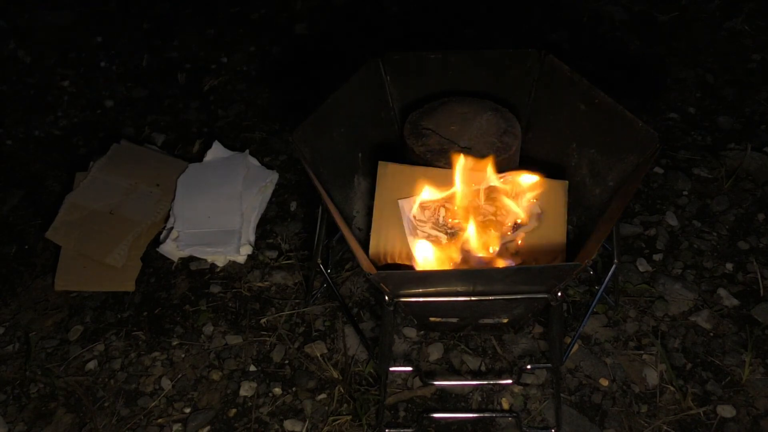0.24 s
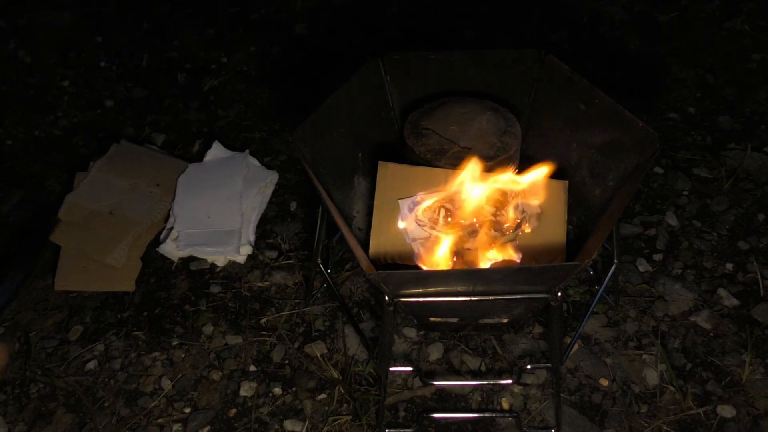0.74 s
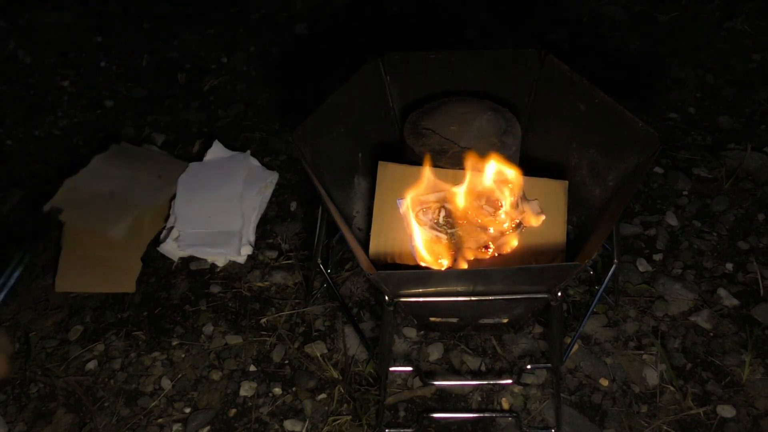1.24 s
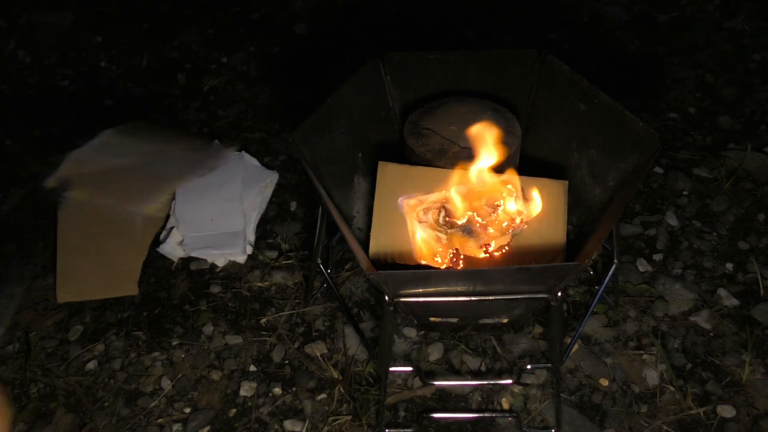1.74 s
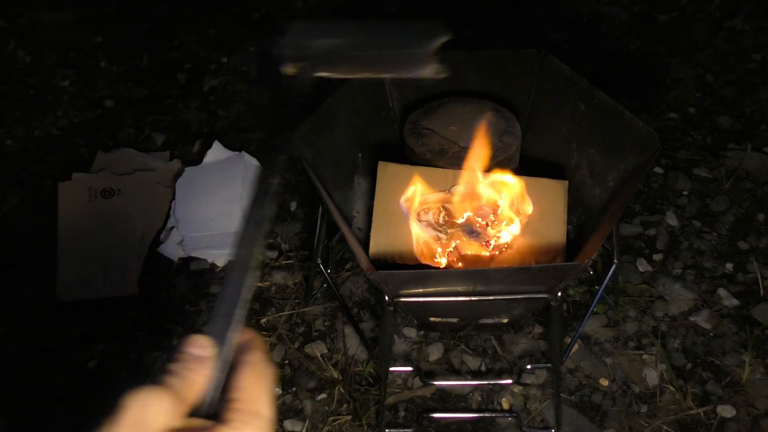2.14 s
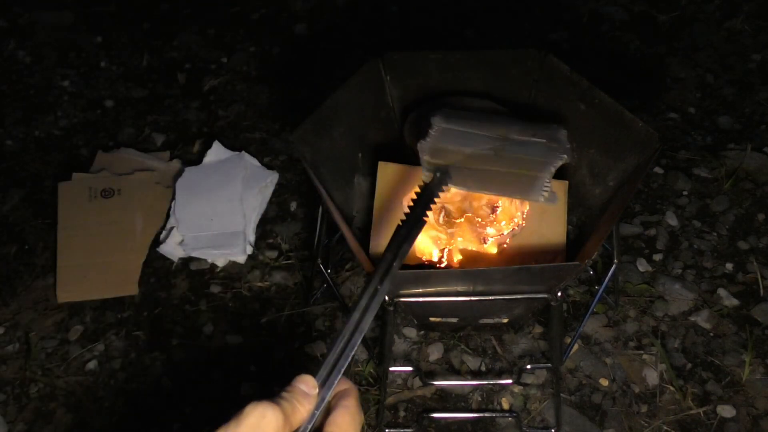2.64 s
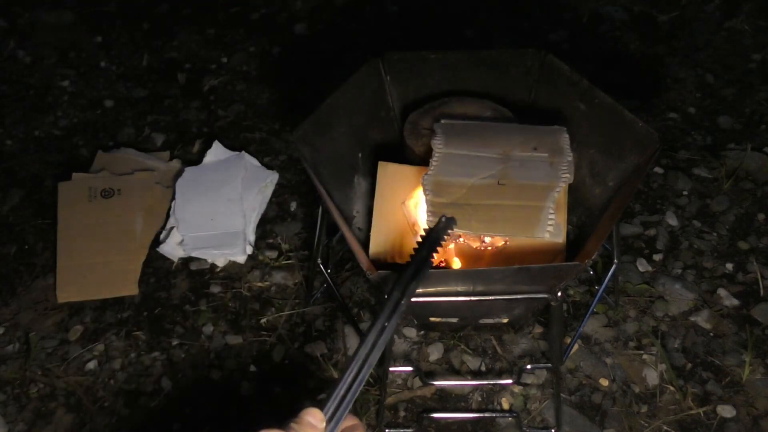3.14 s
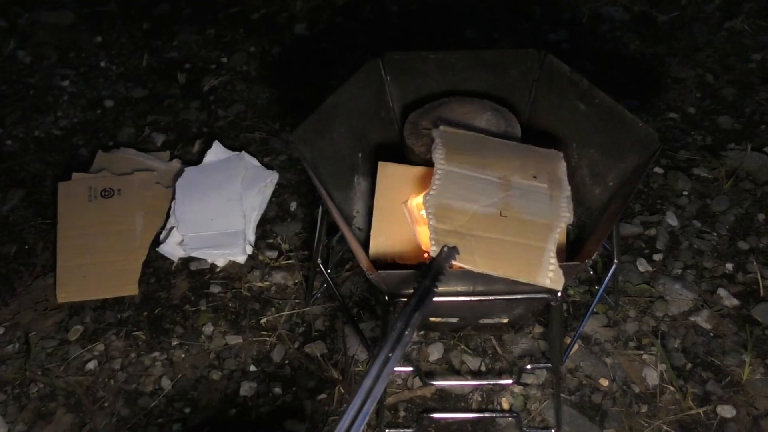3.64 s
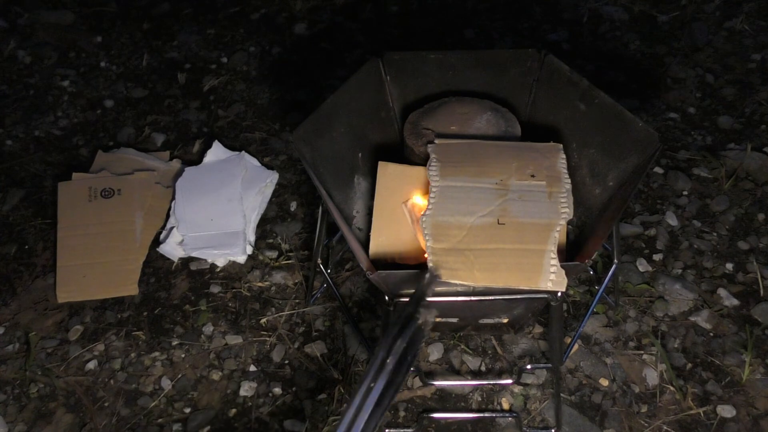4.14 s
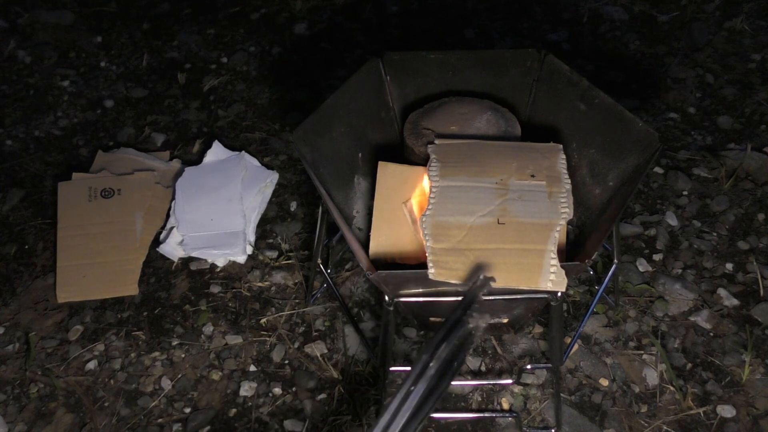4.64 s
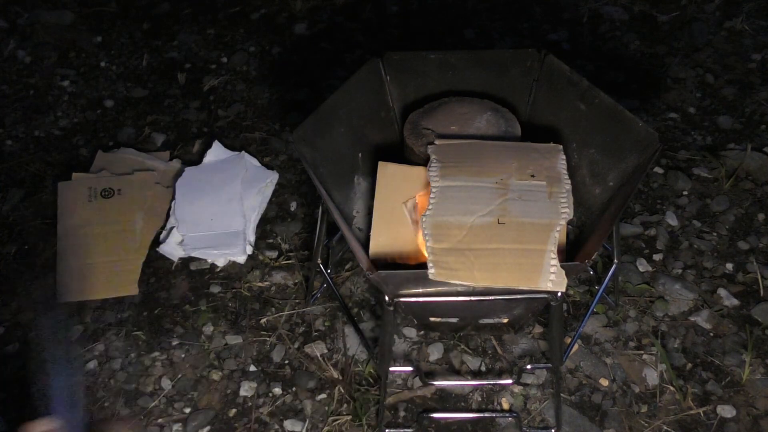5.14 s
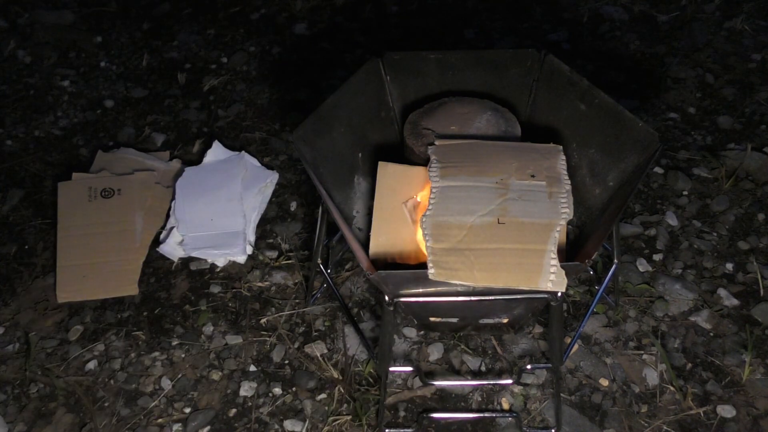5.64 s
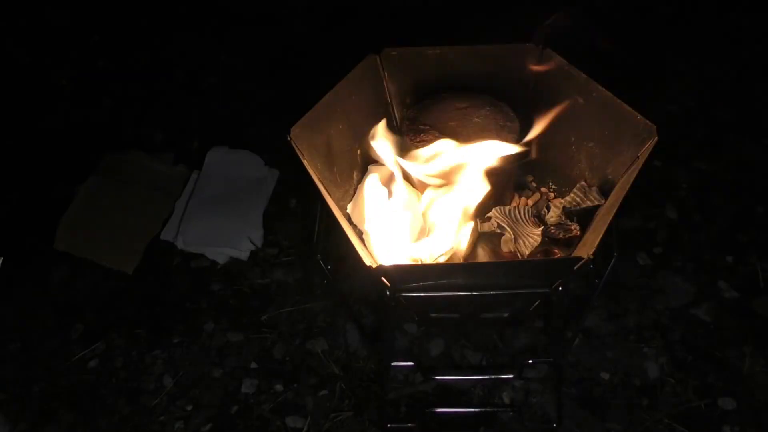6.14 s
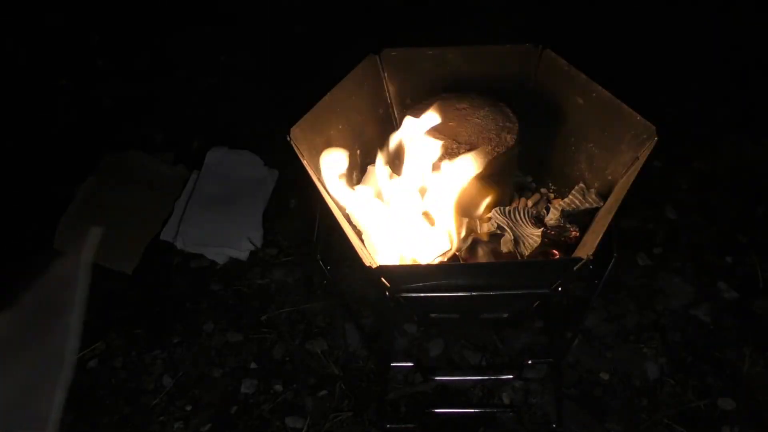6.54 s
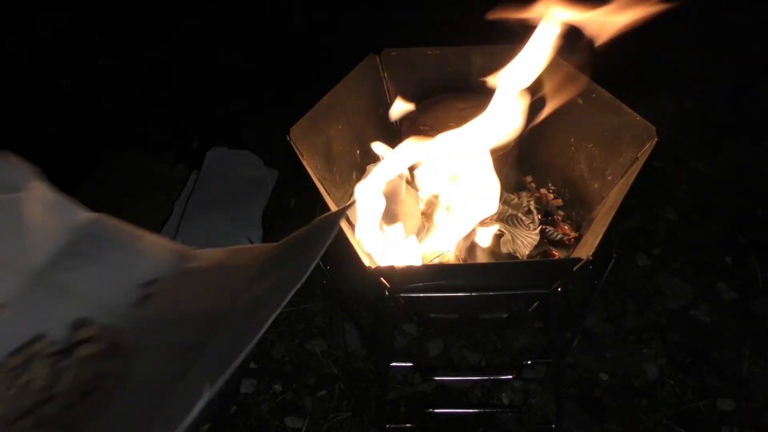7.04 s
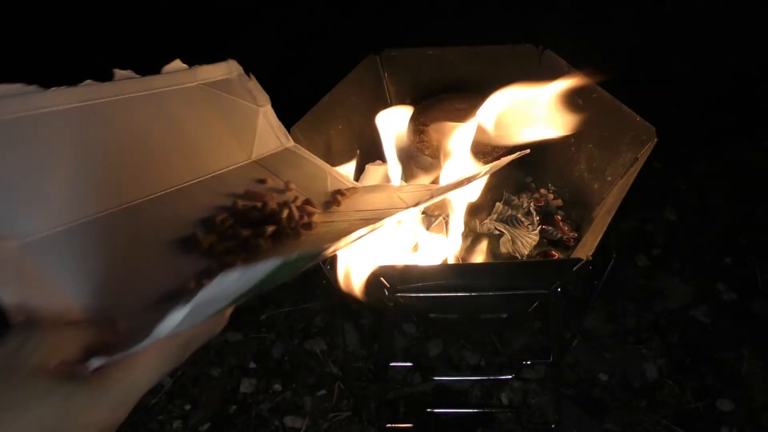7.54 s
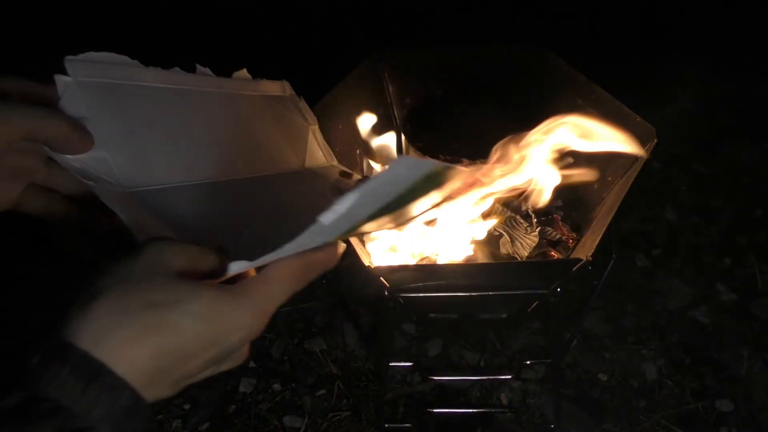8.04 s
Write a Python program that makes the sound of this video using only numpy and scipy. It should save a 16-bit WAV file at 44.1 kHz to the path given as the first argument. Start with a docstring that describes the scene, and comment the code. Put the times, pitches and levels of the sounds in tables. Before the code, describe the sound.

From the start a dense chorus of tree crickets trills around 4.5 kHz, a wide, shimmering, unbroken drone over still night air, a very faint low hum and the weak rush of a small fire. At about 1.4 s tongs give a dull, short knock on cardboard, and a firmer one at 1.9 s with small clicks following. Light scuffs between 2.6 and 3.5 s go with the flame rush sinking under the cardboard. Mostly crickets remain, with a soft brush near 5.2 s. At 6.1 s the level dips for an instant; then the fire is fuller and slowly rising, with a dull fluttering roar and a distant low engine hum. Paper brushes at 6.8 s. From 7.1 s dry kindling taps on the sheet, clustered near 7.4 s, then slides in a growing rustle peaking around 7.95 s, with last taps by 8.25 s.

```python
"""Campsite at night: a dense tree-cricket chorus near 4.5 kHz (pulsed phasors) over a small fire (coloured noise).
Tongs knock on cardboard (decaying noise) and lay it on the flames, whose rush sinks. After a brief dip in
level the fire burns higher, a distant engine hums (two sine orders) and a dull, low roar flutters (noise).
Dry kindling patters on a folded sheet of paper (ringing modes) and slides down it (a stream of noise grains)."""
import sys
import numpy as np
from scipy import signal
from scipy.fft import rfft, irfft
from scipy.io import wavfile
from scipy.ndimage import uniform_filter1d, map_coordinates

SR = 44100
rng = np.random.default_rng(int(sys.argv[2]) if len(sys.argv) > 2 else 0)


def int16_out(signal):
    """Quantize to a 16-bit WAV file."""
    q = np.round(np.clip(np.atleast_2d(signal).T, -1, 1) * 32767)
    wavfile.write(sys.argv[1], SR, q.astype(np.int16))


N = 365148
TIME = np.arange(N) / SR

# cricket songs: slow phasors round a carrier, one value per STEP samples, already singing at t = 0
CARRIER_HZ, STEP, LEAD_IN_STEPS = 4600, 10, 2000
SLOW_TIME = np.arange(-LEAD_IN_STEPS, N // STEP + 1) * STEP / SR

# brief dip in level: from t/s, to t/s
DIP_S = (6.1025, 6.1143)


def gain_of(db):
    """Decibels to amplitude."""
    return 10 ** (np.asarray(db) / 20)


def evened(x):
    """Scales to rms 1."""
    return x / np.sqrt(np.mean(abs(x) ** 2) + 1e-20)


def read(points, hz):
    """Interpolates a table on a log-frequency axis."""
    f, value = np.transpose(points)
    return np.interp(np.log(hz + 1), np.log(f + 1), value)


def add(mix, s, sound):
    """Mixes a sound in at s seconds, cut at the end of the mix."""
    part = mix[..., round(s * SR):][..., :sound.shape[-1]]
    part += sound[..., :part.shape[-1]]


def ramp(start_s, length_s):
    """Linear rise from 0 to 1."""
    return np.clip((TIME - start_s) / length_s, 0, 1)


def bell(middle_s, half_width_s):
    """Gaussian rise to 1 and fall; 1/e at the half width."""
    return np.exp(-((TIME - middle_s) / half_width_s) ** 2)


def swells(rows):
    """Sum of bell-shaped gains from rows of middle t/s, level/dB, half width/s."""
    return sum(gain_of(db) * bell(s, width) for s, db, width in rows)


def wander(t, knots_per_s):
    """Smooth random curve of rms 1 through random knots."""
    knots = rng.standard_normal(2048)
    return evened(map_coordinates(knots, [t * knots_per_s], order=2, mode="wrap"))


def colour(x, spectrum):
    """Filters by a spectrum table; rms 1."""
    shape = gain_of(read(spectrum, np.fft.rfftfreq(N, 1 / SR)))
    return evened(irfft(rfft(x) * shape, N))


# likeness of the two microphone signals: f/Hz, likeness (clipped to 0-1 in use)
LIKENESS = [(30, 0.1), (120, 0.33), (300, 0.17), (600, -0.11), (1300, 0.2), (3000, 0.15), (7000, 0.74),
            (14000, -1.1)]
# phase by which left leads: f/Hz, lead/rad
LEAD = [(100, 0), (1380, .4), (3880, .15), (7490, .9), (9040, 1.1), (15000, 1.6)]
# left minus right: f/Hz, level/dB
TILT = [(60, 0.5), (180, 1.6), (550, 2.3), (1650, 0.5), (4970, 1.0), (15000, 1.5)]


def noise(spectrum):
    """Diffuse coloured noise at two microphones, partly alike; joint rms 1."""
    hz = np.fft.rfftfreq(N, 1 / SR)
    a, b = rfft(rng.standard_normal((2, N)))
    same = np.clip(read(LIKENESS, hz), 0, 1)
    tilt = gain_of(read(TILT, hz) / 2)
    left = a * tilt
    right = (same * a + np.sqrt(1 - same ** 2) * b) * np.exp(-1j * read(LEAD, hz)) / tilt
    return evened(irfft(np.array([left, right]) * gain_of(read(spectrum, hz)), N))


def echoes(x, t60_s, same, rate=SR):
    """Scattered reflections: sparse dying taps over 0.5 s, partly shared by the two sides."""
    t = np.arange(rate // 2) / rate
    shape = 2, len(t)
    taps = rng.standard_normal(shape) * (rng.random(shape) < .2) * gain_of(-60 * t / t60_s)
    a, b = taps / np.linalg.norm(taps, axis=1, keepdims=True)
    sides = np.array([a, same * a + np.sqrt(1 - same ** 2) * b])
    return signal.fftconvolve(x, sides, axes=1)[:, :x.shape[1]]


def placed(song, lead_rad, left_db):
    """Direction of a phasor: phase and level difference between the microphones."""
    tilt = gain_of(left_db / 2)
    return song * np.array([[tilt], [np.exp(-1j * lead_rad) / tilt]])


def from_left(x, left_db, wet_db, t60_s):
    """Near sound left of centre: right is a sample late and weaker; pit and ground reflect it."""
    tilt = gain_of(left_db / 2)
    pair = np.array([x * tilt, np.roll(x, 1) / tilt])
    return pair + gain_of(wet_db) * echoes(pair, t60_s, same=0.4)


def trill(hz, strokes_per_s, sag_hz, duty=.55, drift_hz=26, jitter_hz=22, swell_db=2.0):
    """One cricket: each wing stroke is a tone pulse whose pitch sags as the file slows; rms 1."""
    t = SLOW_TIME - SLOW_TIME[0]
    strokes = np.cumsum(strokes_per_s * (1 + .015 * wander(t, 3))) * STEP / SR + rng.random()
    through = np.minimum(strokes % 1 / duty, 1)  # 0 to 1 over the sounding part
    pitch_hz = hz + sag_hz * (.5 - through) + drift_hz * wander(t, 2) + jitter_hz * wander(t, 90)
    restart = rng.random(1024)[strokes.astype(int) % 1024]  # fresh phase per stroke, in turns
    turns = np.cumsum(pitch_hz - CARRIER_HZ) * STEP / SR + restart
    loudness = np.sin(np.pi * through) * gain_of(swell_db * wander(t, 2.45))
    return evened(loudness * np.exp(2j * np.pi * turns))


# far chorus, relative level by wing pitch: f/Hz, level/dB
CHORUS = [(3880, -31.5), (4020, -25.5), (4120, -15.5), (4210, -12.5), (4300, -4), (4420, -2), (4500, 2),
          (4570, -4.5), (4680, 2), (4780, -6.5), (4860, -3.5), (4950, -12.5), (5030, -12.5), (5110, -22.5),
          (5330, -45)]
# nearer crickets, level before the direct/echo mix: from t/s, to t/s, f/Hz, level/dB, wing strokes/(1/s)
SOLOISTS = [(0, 9, 4500, -36, 26), (0, 7.3, 4600, -36, 54), (6.11, 11, 4840, -38, 56),
            (6.111, 8.3, 5030, -48, 63), (6.11, 7.6, 4570, -34.5, 28)]


def crickets(count=60, chorus_db=-28.5, lead_rad=.48, lead_spread_rad=1.63, left_db=1.2,
             direct_db=-2.5, wet_db=-4):
    """Dozens of crickets, each on its own pitch and beat, blurred by the trees; a few sing nearer."""
    far, near = 0, 0
    for hz in np.linspace(3880, 5330, count):
        strokes_per_s = rng.choice([26, 52]) * rng.uniform(.88, 1.15)
        song = gain_of(read(CHORUS, hz)) * trill(hz, strokes_per_s, sag_hz=161.15)
        far = far + placed(song, lead_rad + lead_spread_rad * (rng.random() - .5), left_db)
    far = gain_of(chorus_db) * evened(far)
    for start_s, end_s, hz, db, strokes_per_s in SOLOISTS:
        singing = np.clip(np.minimum(SLOW_TIME - start_s, end_s - SLOW_TIME) / 0.0025, 0, 1)
        song = gain_of(db) * singing * trill(hz, strokes_per_s, sag_hz=89.8)
        near = near + placed(song, lead_rad, left_db)
    trees = echoes(far + .5 * near, t60_s=0.55, same=.1, rate=SR // STEP)
    songs = gain_of(direct_db) * (far + near) + gain_of(wet_db) * trees
    phasor = signal.resample_poly(songs, STEP, 1, axis=1, window=("kaiser", 10))
    phasor = phasor[:, LEAD_IN_STEPS * STEP:][:, :N]
    return np.sqrt(2) * (phasor * np.exp(2j * np.pi * CARRIER_HZ * TIME)).real


# still night air: f/Hz, level/dB
AIR = [(11, -28), (18, -3), (54, -0.5), (76, -8), (97, -7.5), (214, -10), (314, -13), (376, -10),
       (420, -14.5), (460, -15), (551, -17.5), (1080, -16.5), (2910, -25), (3900, -27.5), (5070, -55),
       (8580, -120)]
# faint treble hiss with the crickets' overtone near 9 kHz: f/Hz, level/dB
HISS = [(3120, -30), (5300, -7), (5370, -7), (5910, -14), (6850, -12), (7880, -20.5), (9150, -13.5),
        (10000, -23), (15600, -25)]


def night(air_db=-43, hiss_db=-54.5, drone_hz=53, drone_db=-50.5, drone_waver_db=1.5):
    """Still air and treble hiss as coloured noise; a faint drone as a sine of wavering pitch and level."""
    from_s, to_s, fade_s = .3, 4.4, .2
    turns = np.cumsum(drone_hz + 2 * wander(TIME, 10)) / SR
    sounding = ramp(from_s, fade_s) - ramp(to_s - fade_s, fade_s)
    drone = np.sin(2 * np.pi * turns) * sounding * gain_of(drone_db + drone_waver_db * wander(TIME, 10))
    return gain_of(air_db) * noise(AIR) + gain_of(hiss_db) * noise(HISS) + drone


# rush of the flames: f/Hz, level/dB
FLAME_COLOUR = [(350, -43), (600, -7.5), (648, -8.5), (869, -7), (1170, -0.5), (1470, -1), (3110, -17.5),
                (3800, -10), (4940, -41.5), (8360, -120)]


def flames(burn_db=-47.5, smothered_db=-55.5, blaze_db=-46.5, blaze_db_per_s=3.5, flutter_db=0.5):
    """Burning paper as fluttering noise: smothered as cardboard is lowered on it, blazing after the dip."""
    cover_s, cover_takes_s = 2.45, 1.48
    covered_db = burn_db + (smothered_db - burn_db) * ramp(cover_s, cover_takes_s)
    blazing_db = blaze_db + blaze_db_per_s * (TIME - DIP_S[1])
    level_db = np.where(TIME < DIP_S[1], covered_db, blazing_db)
    return noise(FLAME_COLOUR) * gain_of(level_db + flutter_db * wander(TIME, 25))


# things put down and picked up: middle t/s, level/dB, half width/s
SWISHES = [(1.44, -54, .08), (5.24, -47.5, 0.23), (6.8, -43.5, 0.15)]
# brushing paper and sleeves: f/Hz, level/dB
SWISH_COLOUR = [(300, -17.5), (1200, 0.5), (2600, -3.5), (4000, -5.5), (8000, -23), (15000, -33)]


def swishes():
    """Paper and sleeves brush softly: noise in bell-shaped swells."""
    return swells(SWISHES) * noise(SWISH_COLOUR)


# tongs on the cardboard pile: t/s, level/dB, t60/s
KNOCKS = [(1.427, -31, 0.036), (1.895, -28, 0.046), (1.912, -39, 0.062), (1.934, -39, .04)]
# dull knock: f/Hz, level/dB
KNOCK_COLOUR = [(88, -53), (150, -21), (235, -8), (919, -2), (1240, -12), (3310, -16), (3900, -29),
                (5070, -59), (8580, -120)]
# scuffs and ticks of cardboard and paper: t/s, level/dB, length/s (peak at a quarter of it)
SCUFFS = [(1.424, -53, 0.018), (1.89, -46.5, .03), (2.585, -50.5, .045), (2.687, -54, .025),
          (2.745, -57, .03), (2.842, -48, .04), (3.105, -50, .02), (3.502, -54, 0.014),
          (7.388, -41.5, .007), (7.645, -47, .02), (7.722, -45, .035), (7.893, -40, .008),
          (8.231, -38, 0.016)]


def handling():
    """Dull knocks as decaying noise; thin scuffs of cardboard and paper edges as bursts of spiky noise."""
    knocks, scuffs = np.zeros((2, N))
    t = TIME[:SR // 4]
    for s, db, t60_s in KNOCKS:
        add(knocks, s, gain_of(db - 60 * t / t60_s) * np.minimum(t / 0.00097, 1))
    for s, db, length_s in SCUFFS:
        u = t / (length_s / 4)
        add(scuffs, s, gain_of(db) * u * np.exp(1 - u))
    thud, grit = rng.standard_normal((2, N))
    # f/Hz, level/dB
    edge = [(1500, -8), (3500, 1), (6000, 2.5), (8200, -2.5), (10000, -13.0), (15000, -15)]
    sound = knocks * colour(thud, KNOCK_COLOUR) + scuffs * colour(grit * abs(grit), edge)
    return from_left(sound, left_db=2.0, wet_db=-8, t60_s=0.11)


def engine(second_hz=146, first_db=-48.5, second_db=-46.5, left_db=-7, waver_db=1.5):
    """Distant engine hum, from the dip on: two low firing orders as sines, sagging under load."""
    load_s, sag_hz_per_s, first_fade_db_per_s = 7.05, 4.26, 9
    swell_s, swell_width_s, swell_db = 7.43, 0.53, 5.5
    loaded_s = np.maximum(TIME - load_s, 0)
    first_phase = np.pi * np.cumsum(second_hz - sag_hz_per_s * loaded_s) / SR  # half the second's pitch
    first = gain_of(first_db - first_fade_db_per_s * loaded_s) * np.exp(1j * first_phase)
    second = gain_of(second_db + swell_db * bell(swell_s, swell_width_s)) * np.exp(2j * first_phase)
    orders = first + placed(second, 1.58, left_db)
    hum = np.sqrt(2) * orders.real * gain_of(waver_db * wander(TIME, 7))
    return hum * (TIME > DIP_S[1])


# dull roar: f/Hz, level/dB
ROAR = [(97, -34), (165, -8), (172, -6.5), (253, -6), (345, -2), (376, -6), (424, -1.5), (492, -11),
        (900, -15), (1170, -41), (1980, -120)]


def roar(roar_db=-43.4, flutter_db=2.5):
    """Dull, low, fluttering roar, heard from the dip on: coloured noise of wandering level."""
    return gain_of(roar_db + flutter_db * wander(TIME, 22)) * noise(ROAR) * (TIME > DIP_S[1])


# modes of the folded sheet, nominal: f/Hz, level/dB, t60/s
PAPER = [(334, -18.5, 0.045), (469, -18, 0.037), (823, -7.5, 0.032), (950, -6.5, 0.022), (1165, -4, 0.037),
         (1343, -2, 0.017), (1520, -10, .016), (1870, -5, 0.015), (2200, -8, 0.015), (2630, -9, 0.012),
         (3090, -12, .009), (4200, -2.5, 0.0071)]


def tap(snap_db=-8, snap_t60_s=0.017, snap_hz=2400, onset_samples=300):
    """A piece lands on the sheet: lowpassed snap plus modes varying in strength, pitch and phase by spot."""
    t = TIME[:SR // 10]
    hz, db, t60_s = np.transpose(PAPER)[:, :, None]
    spot, detune, start_turns = rng.standard_normal((3, len(PAPER), 1))
    envelopes = gain_of(db + 2 * spot - 60 * t / t60_s)
    turns = hz * (1 + 0.043 * detune) * t + start_turns
    ring = (envelopes * np.sin(2 * np.pi * turns)).sum(0)
    ring = ring / np.std(ring[:onset_samples]) * np.minimum(t / 0.00084, 1)
    crack = rng.standard_normal(len(t)) * gain_of(snap_db - 60 * t / snap_t60_s)
    return ring + signal.lfilter(*signal.butter(2, snap_hz, fs=SR), crack)


# pieces dropping on the paper: t/s, level/dB
TAPS = [(7.118, -34), (7.258, -28), (7.289, -33), (7.353, -23), (7.39, -19), (7.3915, -23.5), (7.411, -32),
        (7.548, -21.5), (7.636, -26.5), (7.666, -28), (7.7, -25), (7.731, -24.5), (7.94, -23.5),
        (8.098, -23.5), (8.235, -21.5)]
# shakes and surges of the heap: middle t/s, level/dB, half width/s
SHAKES = [(7.14, -39.5, 0.042), (7.25, -34, 0.039), (7.39, -40, .05), (7.96, -36.5, 0.032)]
# sliding kindling: f/Hz, level/dB
SLIDE_COLOUR = [(150, -20), (300, -15.5), (480, -9), (660, -17), (900, -4), (1350, -0.5), (1750, -10),
                (2150, -7.5), (2550, -15), (2900, -12), (3700, -18.5), (5600, -30), (8500, -38.5),
                (13000, -57)]


def kindling(grains_per_s=900, size_db=-0.5, rub_db=-9, crumbs_per_s=45, crumbs_db=-44.5):
    """Single pieces tap the sheet; the heap slides as it tips: tiny blows over a dry rub, stray crumbs."""
    tip_s, crumbs_from_s = 7.45, 7.2
    peak_s, peak_db, grow_db_per_s, ease_db_per_s = 7.948, -26.5, 30.5, 4.5  # heap gives way at the peak
    sizes = gain_of(size_db * np.minimum(rng.exponential(1, N), 3)) * rng.choice([-1, 1], N)
    blows = evened(sizes * (rng.random(N) < grains_per_s / SR))
    grains = blows + gain_of(rub_db) * rng.standard_normal(N)
    crumbs = sizes * (rng.random(N) < crumbs_per_s / SR)
    pour = gain_of(peak_db + np.minimum(grow_db_per_s * (TIME - peak_s), ease_db_per_s * (peak_s - TIME)))
    sound = (swells(SHAKES) + ramp(tip_s, .2) * pour) * colour(grains, SLIDE_COLOUR)
    sound += gain_of(crumbs_db) * (TIME > crumbs_from_s) * colour(crumbs, SLIDE_COLOUR)
    for s, db in TAPS:
        add(sound, s, gain_of(db) * tap())
    return from_left(sound, left_db=2.7, wet_db=-12.5, t60_s=0.074)


def scene():
    """Sum of all sources."""
    return crickets() + night() + flames() + swishes() + handling() + engine() + roar() + kindling()


def record(dry, dip_db=-22.5, edge_hz=15720):
    """The level dips for an instant; then a steep lowpass limits the band."""
    live = (TIME < DIP_S[0]) | (TIME > DIP_S[1])
    gated = dry * uniform_filter1d(np.where(live, 1, gain_of(dip_db)), size=40)
    lowpass = signal.firwin(511, edge_hz, window=("kaiser", 9), fs=SR)
    return signal.oaconvolve(gated, lowpass[None], "same")


dry = scene()
out = record(dry)
int16_out(out)
```